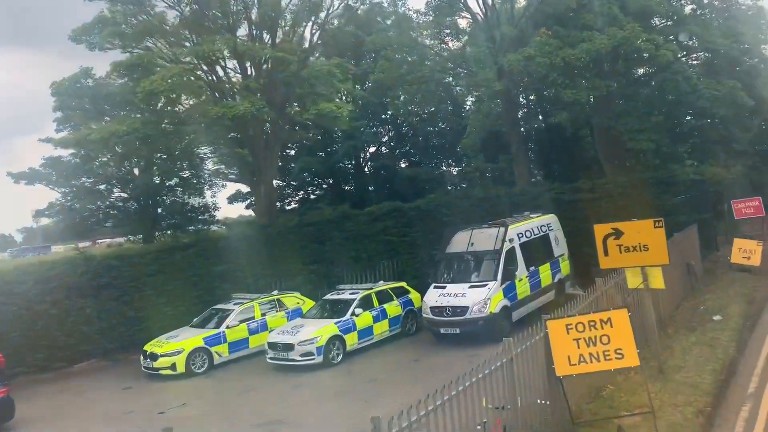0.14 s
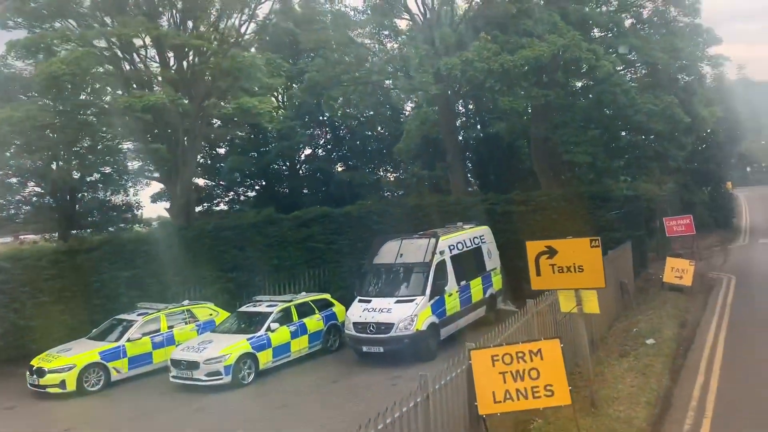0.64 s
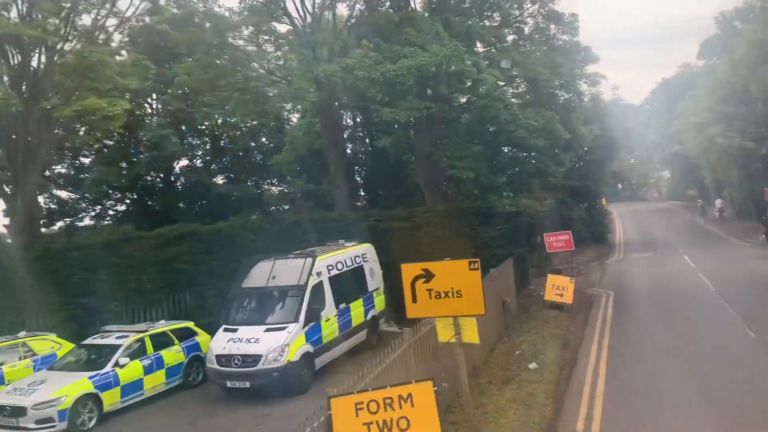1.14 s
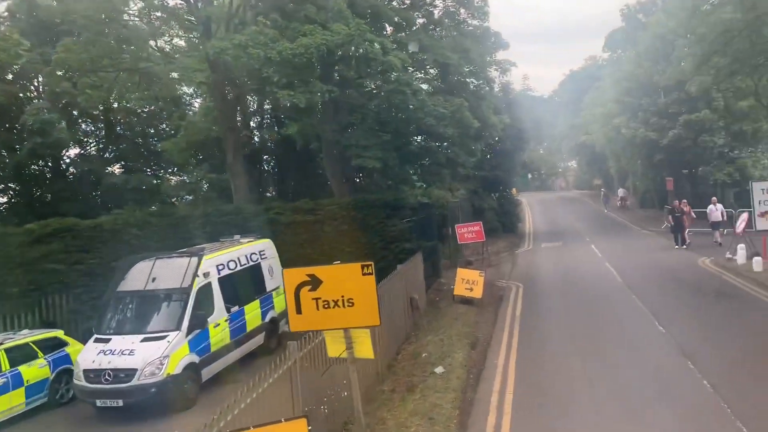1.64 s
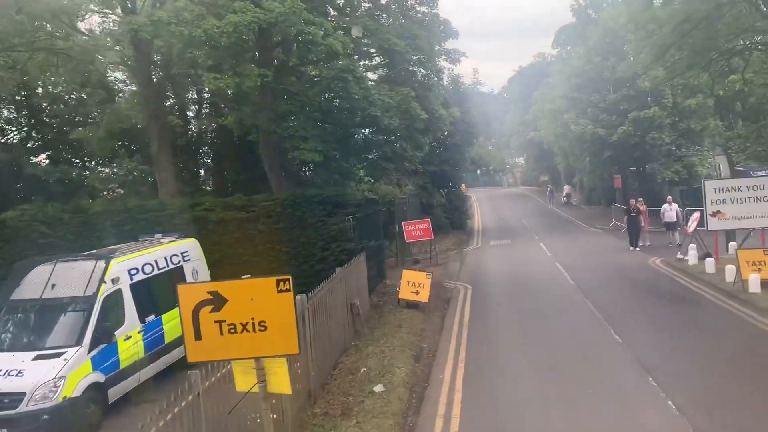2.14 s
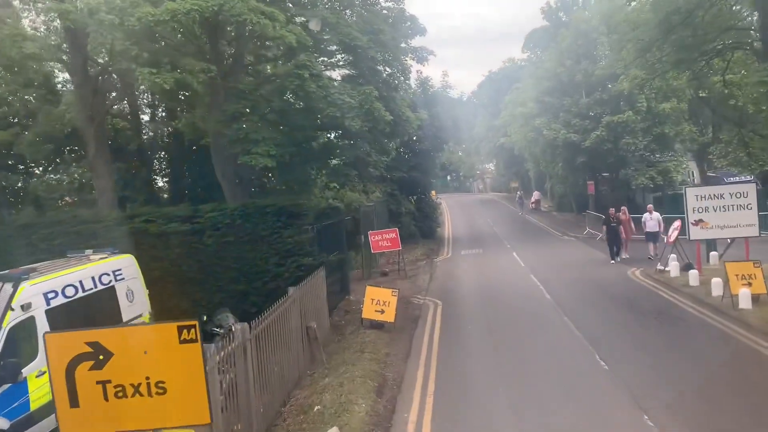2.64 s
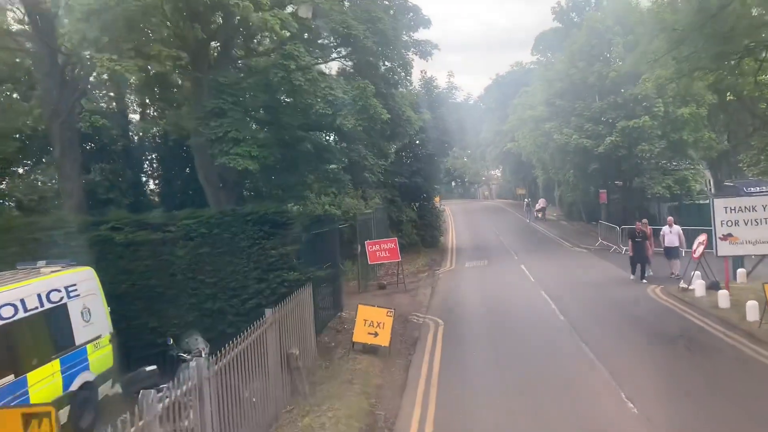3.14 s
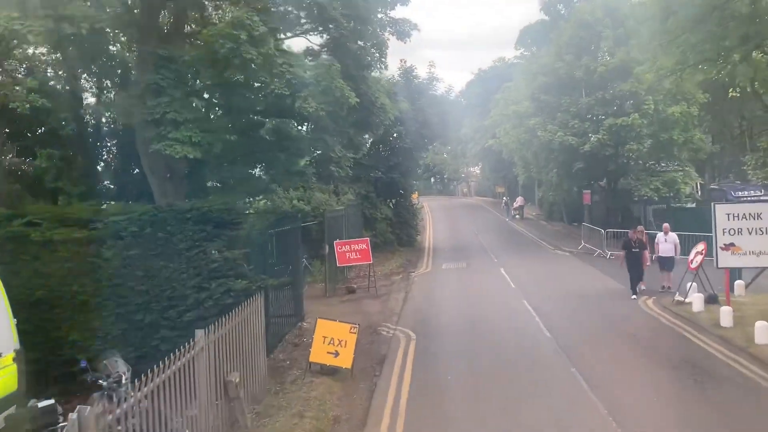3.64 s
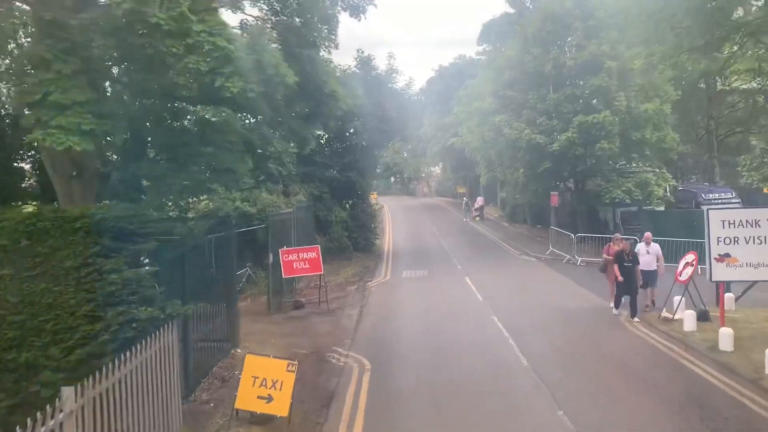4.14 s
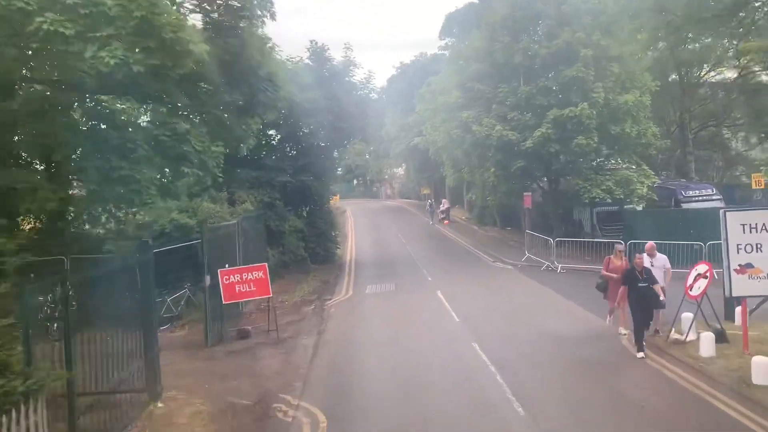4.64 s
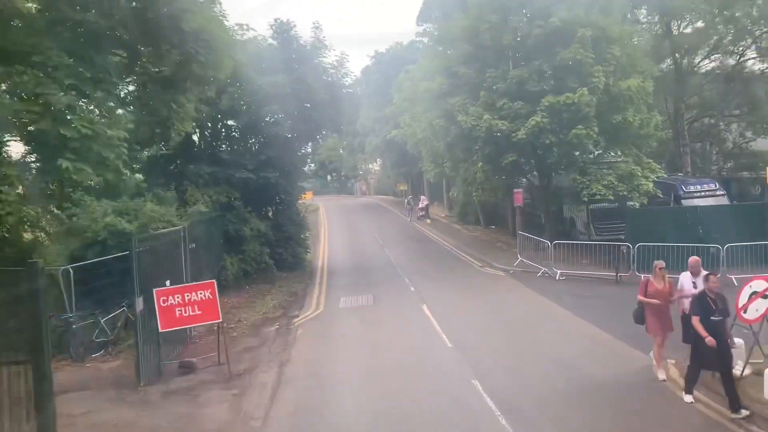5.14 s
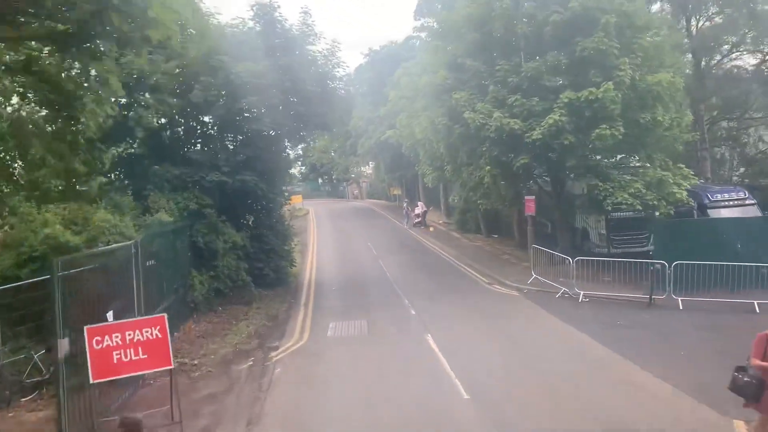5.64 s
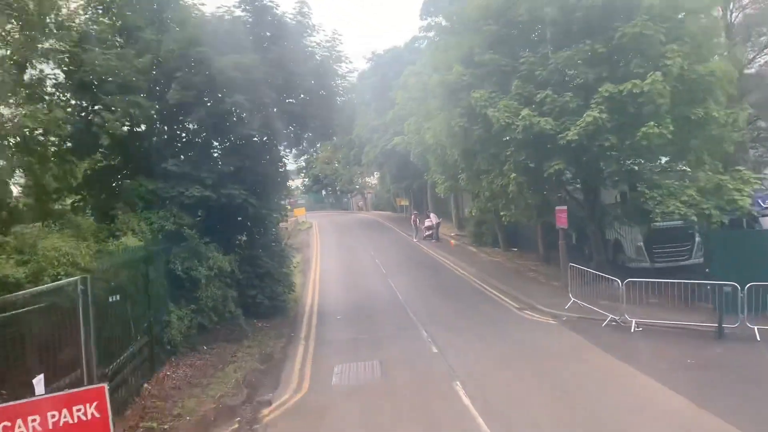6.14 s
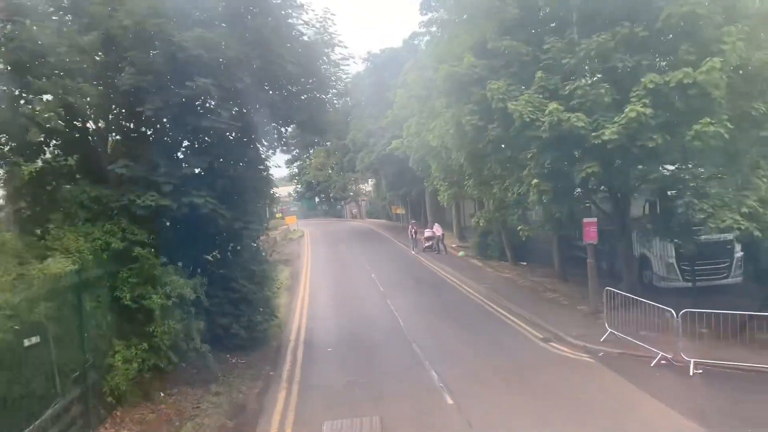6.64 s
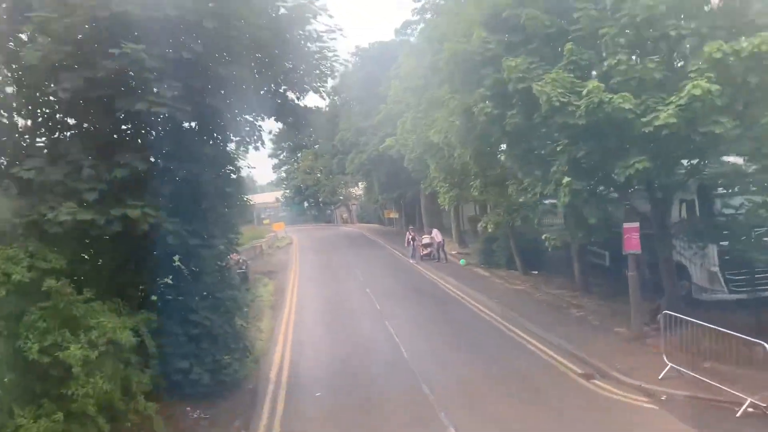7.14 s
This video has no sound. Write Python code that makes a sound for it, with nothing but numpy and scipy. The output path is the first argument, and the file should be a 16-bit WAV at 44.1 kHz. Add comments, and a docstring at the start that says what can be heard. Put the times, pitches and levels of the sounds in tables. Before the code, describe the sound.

Inside a moving bus, a low diesel hum climbs through a gear change over heavy road rumble, with a few loose trim knocks.

```python
"""Diesel firing hum on the upper deck of a bus pulling away: harmonics of a rate that climbs and drops
at a gear change. A floor panel booms and a thin whine wavers, both single sines. Loose trim knocks as
decaying modes. Road rumble and tyre hiss are shaped random spectra through a ringing cabin.
Two spaced microphone ports hear it."""
import sys
import numpy as np
from scipy import signal
from scipy.io import wavfile
from scipy.ndimage import uniform_filter1d

SR = 44100
rng = np.random.default_rng(int(sys.argv[2]) if len(sys.argv) > 2 else 0)


def gain_from_db(level_db):
    """Turn a decibel level (scalar or array-like) into a linear amplitude factor."""
    decades = np.asarray(level_db, float) / 20
    return 10 ** decades


def store_wav(level_fs):
    """Save 16-bit WAV to argv[1]."""
    pcm = np.round(np.clip(np.atleast_2d(level_fs), -1, 1) * 32767)
    wavfile.write(sys.argv[1], SR, pcm.T.astype(np.int16))


N = 320166

# uneven cylinders and overtones: [multiple of firing rate, re hum level/dB]
FIRING_ORDERS = [(.5, -20.5), (1, -2.5), (1.5, -11), (2, -31.5)]
# stretches of driving through the gears: [start t/s, firing rate f/Hz, climb/(Hz/s), rms unsteadiness/share of f]
GEAR_STRETCHES = [(0, 68, -3, .015), (.8, 58, 24, 0.006), (2.929, 66, 5, 0.046), (5.95, 80.04, 8.5, .015),
                  (6.972, 79, -15, 0.039)]
# surges of the firing hum: [start t/s, hold/s, level ahead of the orders/dB]
HUM_SURGES = [(.45, 0.079, -18), (.92, 0.29, -16), (1.5, 0.59, -17.5), (3., 0.063, -13), (3.6, 0.13, -14.5),
              (5.1, 0.16, -16), (5.6, 0.073, -15), (6.08, 0.31, -14.5), (6.68, 0.051, -14.5),
              (7.03, 0.045, -17)]
# spells of floor panel boom: [start t/s, hold/s, level/dB]
BOOM_SPELLS = [(1.8, 0.27, -23.5), (3.3, 0.56, -22.5), (5.6, .15, -26)]
# swells of the whine: [start t/s, hold/s, level/dB]
WHINE_SPELLS = [(2.1, 0.44, -41), (4.2, .8, -35.5), (6.1, .3, -40.5)]
# knocks of loose trim: [t/s, level ahead of the modes/dB, brightness/dB, left re right/dB]
TRIM_KNOCKS = [(.606, -8.5, -34, -3), (.804, -13, -32, -2), (2.077, -34, 13.5, 4), (2.345, -7.5, -9, 8),
               (2.3745, -13, -12.5, 6), (2.918, -12, -35, 1), (5.737, -17, -30, 4), (6.75, -10, -34, 1)]
# trim modes: [f/Hz, level/dB, t60/s, share of the brightness]
TRIM_MODES = [(605, 7.5, 0.025, 0.17), (830, -4, 0.037, 0.17), (1400, -24, 0.0028, 0.54),
              (2160, 7, 0.0078, 0.8), (3020, 5, 0.0033, 0.56), (3630, 6, 0.0047, 1),
              (4770, -7.5, 0.01, 1.6), (6500, -10, .004, 1.3), (8000, -18, .003, 1.16),
              (10500, -14, .003, 1.1), (14500, -18, .003, 1.2)]
# cabin noise between the resonances, base density: [f/Hz, level/(dB per Hz)]
CABIN_NOISE = [(20, -58), (33, -43), (44, -34), (90, -36.5), (140, -40.5), (180, -44.5), (270, -47.5),
               (480, -48), (560, -59.5), (1100, -61.5), (1450, -68.5), (1850, -73), (3000, -80.5),
               (4000, -83.5), (7200, -85), (8100, -87.5), (9300, -88.5), (12500, -91), (14200, -97.5),
               (15700, -100.5)]
# cabin resonances, base density: [f/Hz, -6 dB width/Hz, left level/(dB per Hz), right level/(dB per Hz), right lead/rad]
CABIN_PANELS = [(334, 36, -44, -44, .5), (422, 45, -48, -48, .8), (495, 40, -49, -51, 1.0),
                (630, 35, -56, -54, 1.6), (750, 30, -51, -50, 1.4), (870, 50, -53, -55, 1.9),
                (964, 22, -45, -54, 2.5), (1087, 35, -61, -59, 2.2), (1158, 24, -51, -53, 2.8),
                (1200, 50, -52, -54, 1.1), (1280, 55, -51, -55, 2.0), (1351, 22, -55, -55, .4),
                (1460, 70, -63, -63, .4), (1546, 55, -62, -62, .7), (1631, 45, -58, -57, -2.2),
                (1735, 50, -59, -58, -2.8), (2013, 35, -71, -73, -1.1), (2200, 170, -66, -70, 1.0),
                (2413, 45, -69, -69, -1.1), (2616, 55, -71, -71, -.9), (2729, 70, -70, -70, .4),
                (2821, 45, -73, -72, -.9), (2925, 70, -76, -76, -.6), (3205, 70, -73, -74, -1.0),
                (3430, 70, -73, -75, -2.9), (3720, 120, -78, -79, 1.5), (4220, 110, -80, -80, 2.2),
                (4736, 22, -77, -79, 1.6), (5350, 220, -83, -84, 2.0)]
# likeness of left and right noise, high again in the top treble: [f/Hz, likeness 0-1, right lead/rad]
LEFT_RIGHT_LIKENESS = [(40, .97, .45), (420, .9, .45), (600, .7, 1.6), (1200, .6, 2.6), (1450, .5, .8),
                       (1800, .8, 3.2), (2100, .3, 5.2), (3000, .2, 5.6), (5500, .1, 6.3), (6500, .25, 6.3),
                       (7500, .55, 7.8), (8600, .94, 9.42), (11000, .96, 12.57), (12700, .9, 14.85),
                       (13150, .9, 15.6), (14300, .9, 15.9), (15000, .8, 18.6), (15700, .9, 18.85)]
# ports turn between side window and front: [t/s, share of the turn]
PORT_TURN = [(0, 0.2), (.9, 1), (1.3, 0.5), (2.6, 0.1), (3, 0.94), (5.5, .9), (7.26, 1.01)]
# effect of a full turn on the resonances: [f/Hz, gain/dB]
PORT_TURN_GAIN = [(300, 2), (900, 2.1), (1300, -1), (1450, -2), (1700, 0.3), (2800, 0), (3430, 3.5),
                  (4000, -1), (5350, 9)]
# road surface: [t/s, roughness/dB]
ROAD_ROUGHNESS = [(0, -1.5), (.8, 0.5), (1.2, -6), (2.5, -3), (3, 0), (4.5, 1.5), (5.4, -2.5), (5.9, 1.5),
                  (6.85, 4.5), (7.26, 0.5)]
# how far the noise follows the roughness: [f/Hz, share]
ROUGHNESS_SHARE = [(45, 0.33), (90, 0.75), (200, 0.99), (400, 0.16), (1000, 0.035), (8500, 0.045)]
# effect of the hard pull in low gear on the noise: [f/Hz, gain/dB]
PULL_NOISE_GAIN = [(45, -1), (150, 0.5), (300, 2.5), (700, 0.1), (1400, 1), (2200, -1), (3000, 4),
                   (5200, 2), (8500, -3), (12000, -1)]
# brief puff of air hiss: [f/Hz, gain/dB]
PUFF_NOISE_GAIN = [(1000, 0.11), (2600, 2.1), (5200, 5.7), (8500, 1.5), (12000, 2.7)]
# noise tilt as speed builds: [f/Hz, growth/(dB/s)]
SPEED_TILT = [(300, -0.13), (650, .15), (1100, 0.07), (2600, -0.22), (5200, 0.3), (8500, -0.18)]


def curves(rows, t):
    """Every column of a table at the times t."""
    s, *columns = np.transpose(rows)
    return [np.interp(t, s, c) for c in columns]


def across(rows, hz):
    """Every column of a table at the frequencies hz, on a log axis."""
    f, *columns = np.transpose(rows)
    return [np.interp(np.log(hz + 1), np.log(f + 1), c) for c in columns]


def waver(seconds):
    """Slow random wander of rms 1: noise averaged twice over the given time."""
    size = round(seconds * SR)
    x = uniform_filter1d(uniform_filter1d(rng.standard_normal(N), size), size)
    return x / x.std()


def spells(rows, rest_db, rise_db_per_s, fall_db_per_s):
    """A resting level that rises to each spell, holds and falls back."""
    t = np.arange(N) / SR
    tops = []
    for start_s, hold_s, db in rows:
        rise_db = rise_db_per_s * np.maximum(start_s - t, 0)
        fall_db = fall_db_per_s * np.maximum(t - start_s - hold_s, 0)
        tops.append(db - rise_db - fall_db)
    return np.maximum(np.max(tops, 0), rest_db)


def tone(hz, rms_db, lead_rad):
    """A sine of given rms at both ports, the right one ahead in phase."""
    phase = 2 * np.pi * (np.cumsum(hz) / SR + rng.random())
    return np.sqrt(2) * gain_from_db(rms_db) * np.array([np.sin(phase), np.sin(phase + lead_rad)])


def engine():
    """Low orders of an unsteady firing rate, standing out in surges."""
    shift_s = 0.16  # the revs slide into each new stretch
    t = np.arange(N) / SR
    start_s, start_hz, climb, unsteady = np.transpose(GEAR_STRETCHES)
    gear = np.maximum(np.searchsorted(start_s, t, "right") - 1, 0)
    hz = uniform_filter1d(start_hz[gear] + climb[gear] * (t - start_s[gear]), round(shift_s * SR))
    hum_db = spells(HUM_SURGES, rest_db=-22.5, rise_db_per_s=50, fall_db_per_s=40)
    hz = hz * (1 + unsteady[gear] * waver(0.056))
    return sum(tone(k * hz, hum_db + db + 0.85 * waver(0.12), 0.31) for k, db in FIRING_ORDERS)


def boom():
    """The floor panel's low note: a sagging sine, unsteady in pitch and level."""
    start_hz, sag_hz_per_s = 130.3, 1.2
    hz = start_hz - sag_hz_per_s * np.arange(N) / SR
    level_db = spells(BOOM_SPELLS, rest_db=-34, rise_db_per_s=38, fall_db_per_s=38)
    return tone(hz + 1.26 * waver(0.056), level_db + 1.1 * waver(0.39), 0.12)


def whine():
    """A narrow wavering sine whose phase between the ports swings as they turn."""
    start_hz, sag_hz_per_s = 1435.5, .85
    side_lead_rad, front_lead_rad = .55, 2.4
    swing_mid_s, swing_length_s = 2.92, .2
    t = np.arange(N) / SR
    swing = .5 + .5 * np.tanh((t - swing_mid_s) / swing_length_s)
    lead_rad = side_lead_rad + (front_lead_rad - side_lead_rad) * swing
    level_db = spells(WHINE_SPELLS, rest_db=-43.5, rise_db_per_s=15, fall_db_per_s=15)
    hz = start_hz - sag_hz_per_s * t + 1.5 * waver(.05)
    return tone(hz, level_db + 1.5 * waver(.08), lead_rad)


def knocks():
    """Each knock rings the trim's decaying modes; harder contacts wake the higher ones."""
    right_early = 6  # samples
    out, t = np.zeros((2, N)), np.arange(3000) / SR
    for knock_s, level_db, bright_db, pan_db in TRIM_KNOCKS:
        ring = np.zeros(len(t))
        for hz, db, t60_s, share in TRIM_MODES:
            decay = gain_from_db(db + share * bright_db - 60 * t / t60_s)
            build = 1 - np.exp(-.8 * hz * t)  # over about a cycle
            ring += decay * build * np.sin(2 * np.pi * hz * t)
        at = round(knock_s * SR)
        out[0, at:at + len(t)] += gain_from_db(level_db + pan_db / 2) * ring
        shadowed = uniform_filter1d(ring, size=5)  # right port is duller
        at -= right_early
        out[1, at:at + len(t)] += gain_from_db(level_db - pan_db / 2) * shadowed
    return out


def road_level(t, hz):
    """Noise level/dB over frequency and time from road surface, pull, puff and speed."""
    pull_start_s, pull_hold_s, pull_ease_s = 1.25, 1.15, 0.37
    puff_mid_s, puff_half_s = 4.4, 0.079
    inside_s = np.minimum(t - pull_start_s, pull_start_s + pull_hold_s - t)
    pull = np.clip(1 + inside_s / pull_ease_s, 0, 1)
    puff = np.exp(-((t - puff_mid_s) / puff_half_s) ** 2)
    controls = [(ROUGHNESS_SHARE, curves(ROAD_ROUGHNESS, t)[0]), (PULL_NOISE_GAIN, pull),
                (PUFF_NOISE_GAIN, puff), (SPEED_TILT, t - t.mean())]
    return sum(np.outer(across(table, hz)[0], control) for table, control in controls)


def diffuse_noise(hz, left, other):
    """Cabin noise between resonances, left and right alike by a share set over frequency."""
    same, lead_rad = (c[:, None] for c in across(LEFT_RIGHT_LIKENESS, hz))
    same = np.clip(same, 0, 1)
    right = (same * left + np.sqrt(1 - same ** 2) * other) * np.exp(1j * lead_rad)
    return gain_from_db(across(CABIN_NOISE, hz)[0])[:, None] * np.array([left, right])


def panel_response(hz, t):
    """Resonances of the cabin panels at both ports, each shaken unevenly and regained by the turn."""
    f, width, left_db, right_db, lead_rad = (c[:, None] for c in np.transpose(CABIN_PANELS))
    ring = 1 / (1 + 2j * (hz - f) / width) ** 2  # steep skirts keep the valleys dark
    wander = uniform_filter1d(rng.standard_normal((len(CABIN_PANELS), len(t))), 8, 1)
    turn_db = across(PORT_TURN_GAIN, f)[0] * (curves(PORT_TURN, t)[0] - .5)
    shake = gain_from_db(turn_db + 1.3 * wander / wander.std())
    left = (gain_from_db(left_db) * ring).T @ shake
    right = (gain_from_db(right_db) * np.exp(1j * lead_rad) * ring).T @ shake
    return np.array([left, right])


def road():
    """Random short-time spectra: diffuse cabin noise plus panels shaken by one common drive."""
    size, hop = 4096, 1024
    lump_db, lump_s, lump_hz = 1.1, .012, 800  # quick uneven beats shake the low roar as a whole
    frames, hz = N // hop + 5, np.fft.rfftfreq(size, 1 / SR)
    z = rng.standard_normal((frames, len(hz), 7)).T
    left, other, drive = (z[:3] + 1j * z[3:6]) / np.sqrt(2)
    t = np.arange(frames) * hop / SR
    field = diffuse_noise(hz, left, other) + panel_response(hz, t) * drive
    level_db = road_level(t - size / 2 / SR, hz)  # at frame starts
    # road bumps jolt the low end
    bump_shape = np.exp(-((np.log(hz + 1) - np.log(170)) / 0.84) ** 2)
    level_db += 1.83 * rng.standard_normal(frames) * bump_shape[:, None]
    patches = uniform_filter1d(uniform_filter1d(z[6], 9, 0), 3, 1)  # drifting unevenness
    field = field * gain_from_db(level_db + 1.64 * patches / patches.std())
    per_bin = np.sqrt(3 * SR / size)  # density per Hz to bin height
    low = 1 / (1 + (hz / lump_hz) ** 4)[:, None]
    roar, hiss = (signal.istft(per_bin * share * field, nperseg=size, noverlap=size - hop)[1][:, :N]
                  for share in (low, 1 - low))
    beats = gain_from_db(lump_db * waver(lump_s) - lump_db ** 2 / 8.7)  # mean power kept
    return roar * beats + hiss


def scene():
    """Everything heard on the upper deck."""
    return engine() + boom() + whine() + road() + knocks()


def low_pass(x):
    """Removes everything above the highest recorded frequency."""
    return signal.sosfilt(signal.butter(12, 17100, fs=SR, output="sos"), x)


def record(dry):
    """Port sensitivities (left higher), bass cut, soft limiting of the peaks, band limit."""
    bass_cut_hz, edge_hz = 33, 15760
    high_pass = signal.butter(4, bass_cut_hz, "high", fs=SR, output="sos")
    cut = signal.sosfilt(high_pass, dry * gain_from_db([[.25], [-.25]]))
    limited = 1.385 * np.tanh(cut / 1.237)
    edge = signal.firwin(1023, edge_hz, window=("kaiser", 9), fs=SR)
    mix = signal.oaconvolve(limited, edge[None], "same")
    return low_pass(mix)


dry = scene()
out = record(dry)
store_wav(out)
```